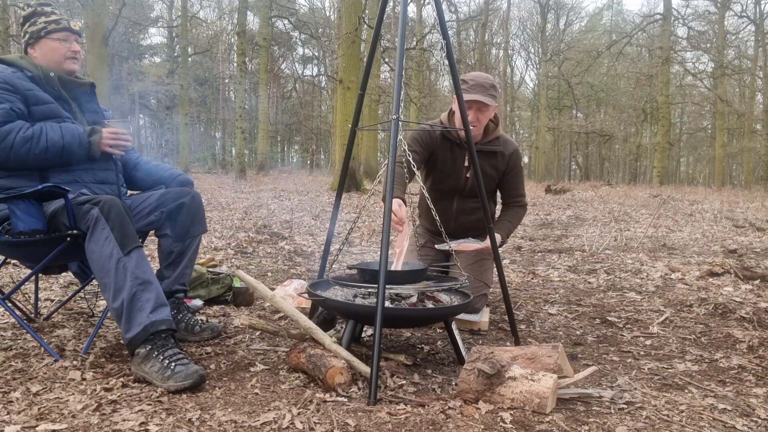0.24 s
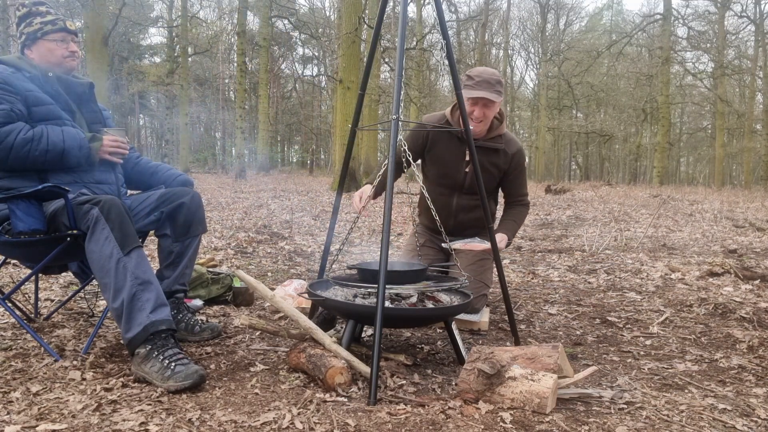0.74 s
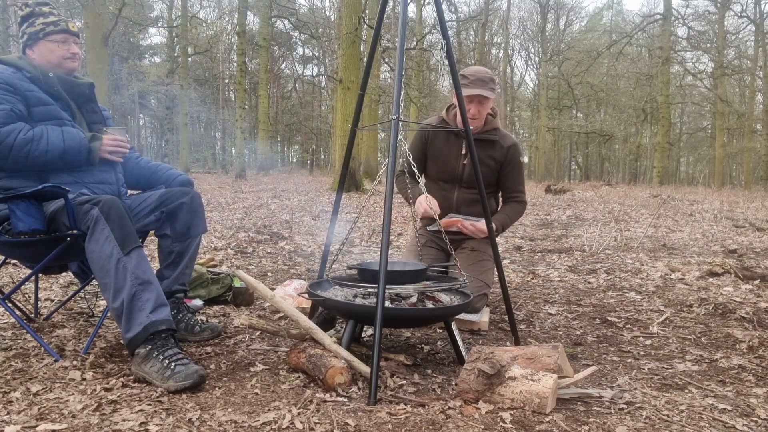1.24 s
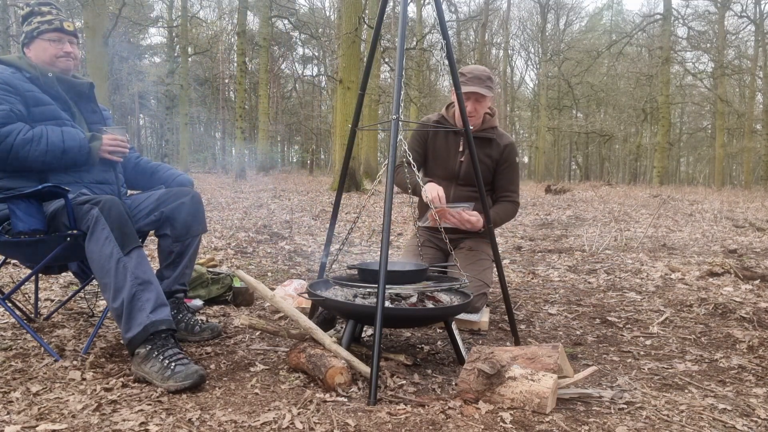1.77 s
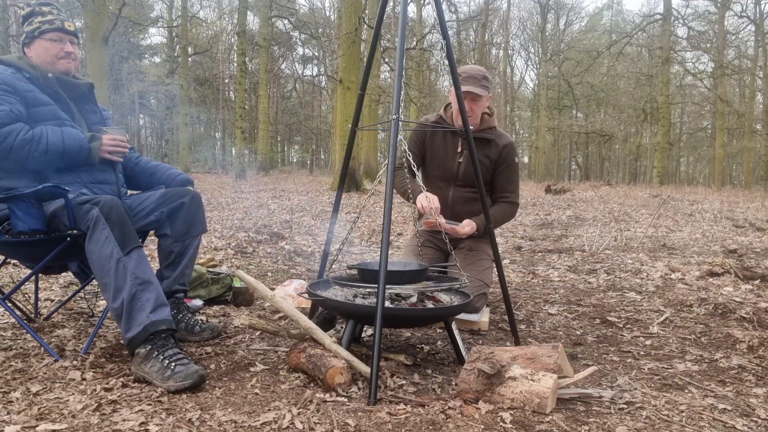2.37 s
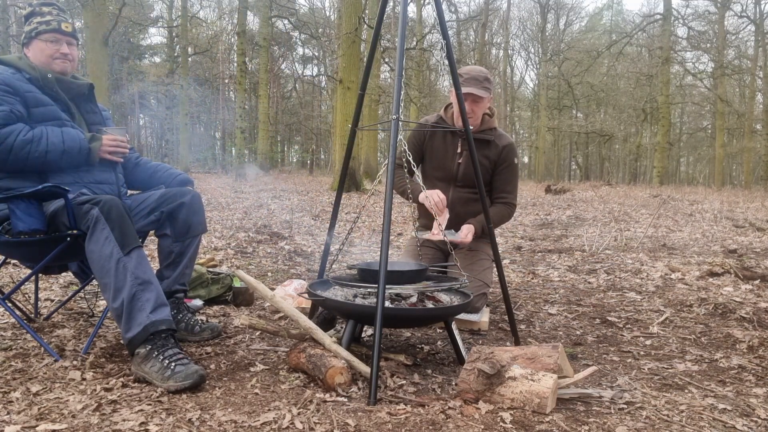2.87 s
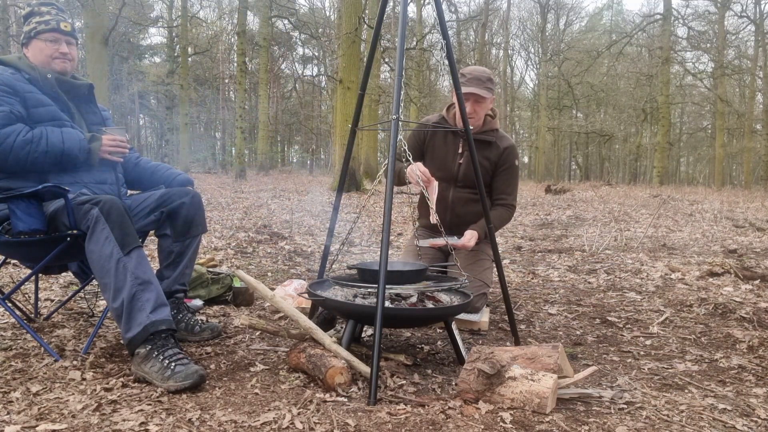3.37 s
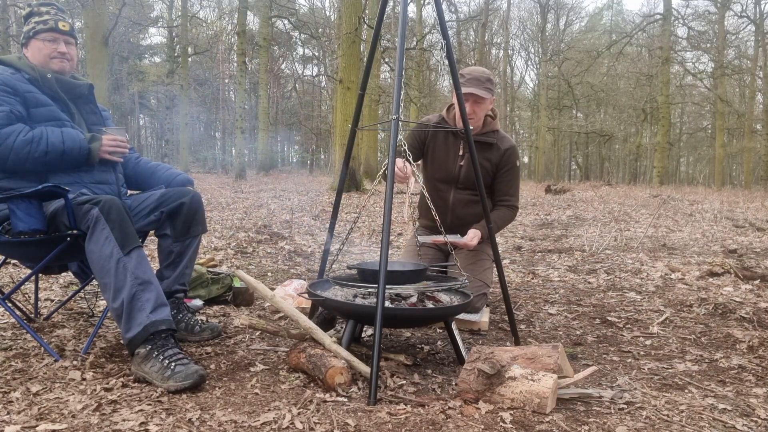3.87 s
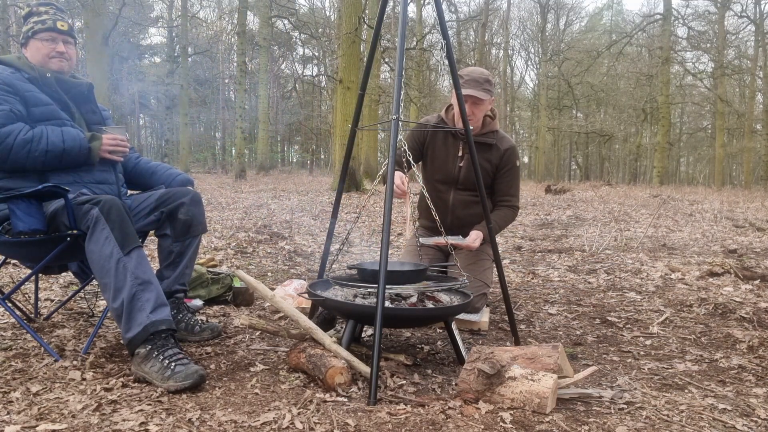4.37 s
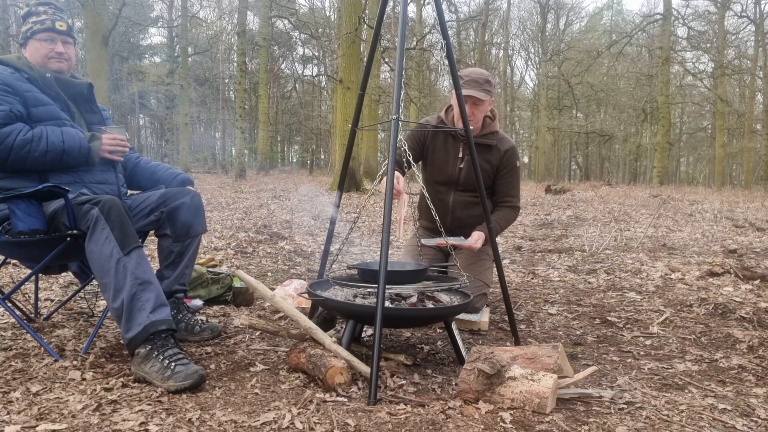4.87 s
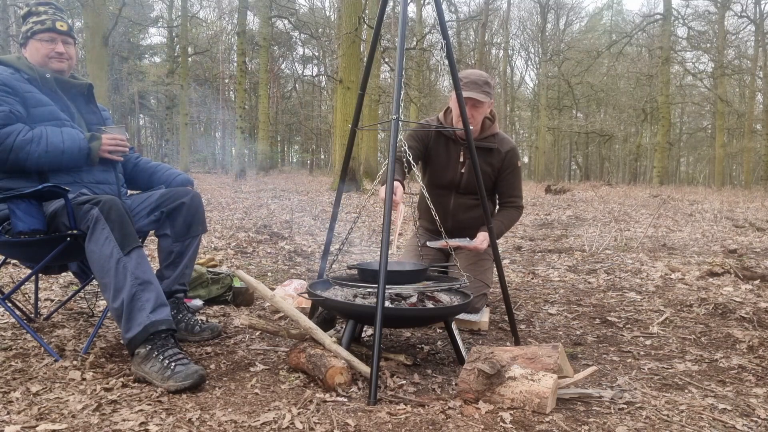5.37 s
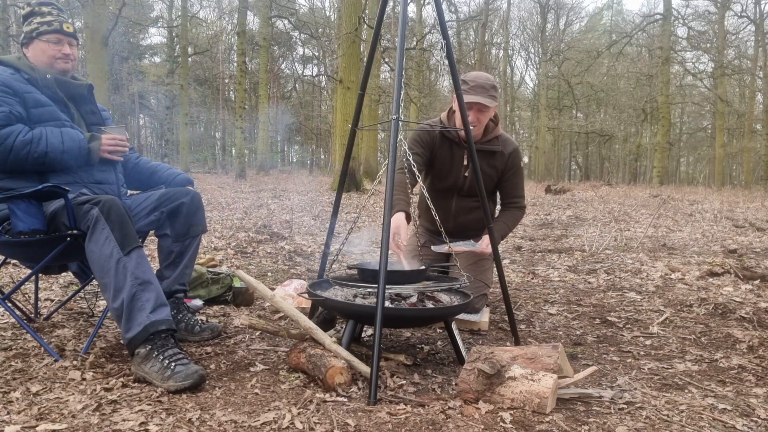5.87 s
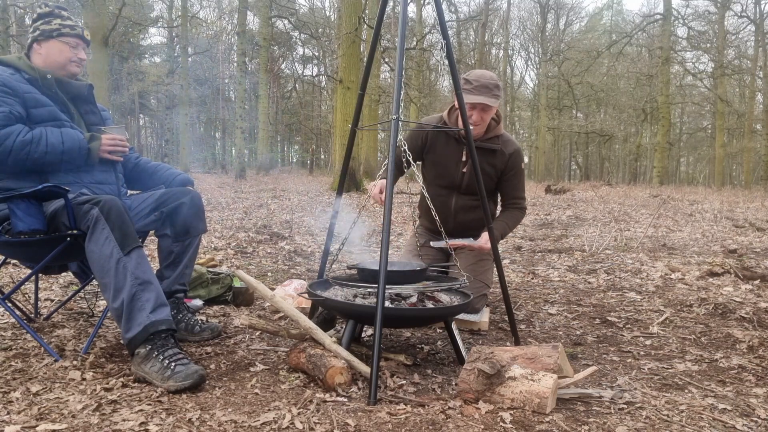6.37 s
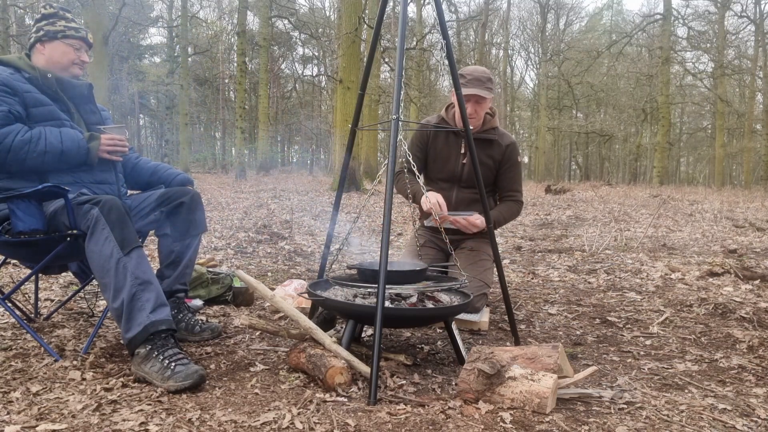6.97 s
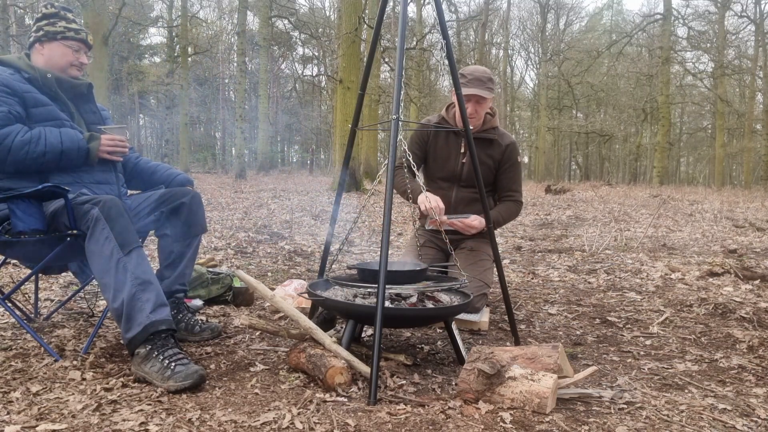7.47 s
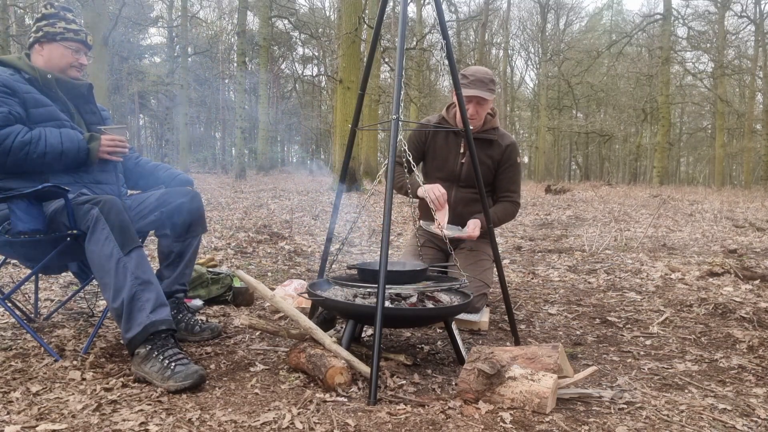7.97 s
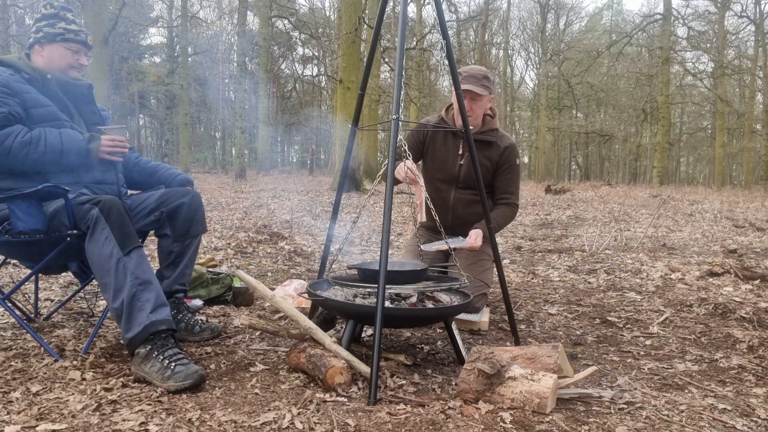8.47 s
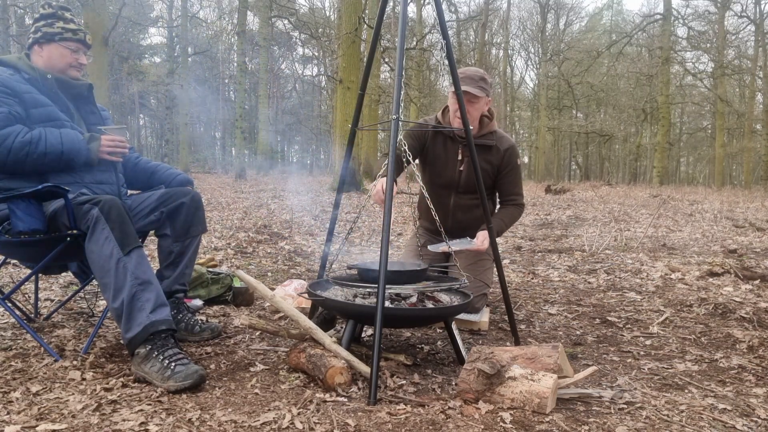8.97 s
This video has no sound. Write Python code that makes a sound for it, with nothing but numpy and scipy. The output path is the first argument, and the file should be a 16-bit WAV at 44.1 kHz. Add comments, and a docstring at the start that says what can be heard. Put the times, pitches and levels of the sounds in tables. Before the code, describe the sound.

Bacon fries in an iron pan over a wood fire in a woodland clearing, in front and slightly left. A steady, bright sizzle with bubbling and small spits runs throughout, above a low hum like a far engine and an occasional soft flutter of flames. Burning wood snaps irregularly, most sharply at about 0.2, 1.5, 5 and 7.6 seconds. Steam bursts in short hollow pops, clustering around 1.7, 5.9 and 7.2 seconds, with the loudest at 8 seconds. Small birds trill and whistle faintly among the trees from 0.6 until 4 seconds. Light handling rustles come and go from 0.6 to about 8.5 seconds, and a few soft, dull knocks sound, clearest near 1.2 and 5.1 seconds. The pan rings faintly near 0.9 and 5.9 seconds as fresh rashers go in. The sizzle continues to the end, just past 9 seconds.

```python
"""Bacon fries in a pan hung over a wood fire in a woodland clearing.
From the start, over a low hum as of a far engine, fat sizzles, bubbles and spits and flames flutter.
Burning wood snaps, steam pockets burst with hollow pops, and dull knocks sound. From 0.6 s handling
rustles and small birds call faintly, the birds until 4 s. Near 0.9 s and 5.9 s a fresh rasher sets
the iron ringing. The loudest pop comes at 8 s."""
import sys
import numpy as np
from scipy import signal
from scipy.fft import rfft, irfft, next_fast_len
from scipy.io import wavfile
from scipy.ndimage import uniform_filter1d

SR = 44100
rng = np.random.default_rng(int(sys.argv[2]) if len(sys.argv) > 2 else 0)


def dump(signal):
    """Clip the signal to [-1, 1] and save it as 16-bit WAV at the path in sys.argv[1]."""
    limited = np.clip(np.atleast_2d(signal).T, -1, 1)
    pcm = np.round(limited * 32767).astype(np.int16)
    wavfile.write(sys.argv[1], SR, pcm)


N = 407043
T = np.arange(N) / SR
FFT_SIZE = next_fast_len(N + 2048)
FFT_HZ = np.fft.rfftfreq(FFT_SIZE, 1 / SR)


def gain(db):
    """Decibels to amplitude."""
    return 10 ** (np.asarray(db) / 20)


def unit_rms(x):
    """Scale to rms 1."""
    return x / np.sqrt(np.mean(x ** 2) + 1e-20)


def unit_peak(x):
    """Scale the envelope peak to 1."""
    return x / abs(signal.hilbert(x)).max()


def lookup(points, hz):
    """Interpolate a table on a log-frequency axis."""
    f, value = np.transpose(points)
    return np.interp(np.log(hz + 1), np.log(f + 1), value)


def add(mix, start_s, sound):
    """Mix a sound in at start_s."""
    part = mix[max(round(start_s * SR), 0):][:len(sound)]
    part += sound[:len(part)]


def coloured(x, colour):
    """Filter by rows of freq_hz, gain_db."""
    return irfft(rfft(x, FFT_SIZE) * gain(lookup(colour, FFT_HZ)), FFT_SIZE)[..., :N]


def click(spectrum_db):
    """Minimum-phase pulse with this spectral shape from 0 Hz to SR / 2."""
    log_gain = np.log(gain(np.maximum(spectrum_db, spectrum_db.max() - 70)))
    mirrored = np.concatenate([log_gain, log_gain[-2:0:-1]])
    spectrum = np.exp(np.conj(signal.hilbert(mirrored)))
    return unit_peak(np.fft.ifft(spectrum).real)


def child_rng():
    """Independent random stream."""
    return np.random.default_rng(rng.integers(1 << 30))


def drift(top_hz):
    """Slow random curve, rms 1."""
    knots_s = np.arange(0, N / SR + 1, 1 / (2 * top_hz))
    return unit_rms(np.interp(T, knots_s, child_rng().standard_normal(len(knots_s))))


def impulses(per_s, spread_db, cap=4):
    """Random impulse train, sizes spanning cap * spread_db."""
    when, size, sign = child_rng().random((int(per_s * N / SR) + 1, 3)).T
    height = gain(spread_db * np.minimum(-np.log(1 - size), cap)) * np.sign(sign - .5)
    return np.bincount((when * N).astype(int), height, N)


def swells(rows):
    """Envelope of Gaussian swells."""
    return sum(gain(db) * np.exp(-2 * ((T - mid_s) / width_s) ** 2) for mid_s, width_s, db in rows)


def scatter(x, near_db, near_t60_s, far_db, far_t60_s):
    """Direct sound, quick reflections off pan, fire bowl and ground, and a return from the trees."""
    t = np.arange(SR // 2) / SR
    near, far = rng.standard_normal((2, 2, len(t))) * (t > .0012)
    near, far = near * gain(-60 * t / near_t60_s), far * gain(-60 * t / far_t60_s)
    near = near + near[::-1] / 2  # channel crossfeed
    tail = gain(near_db) * near / np.linalg.norm(near[0]) + gain(far_db) * far / np.linalg.norm(far[0])
    return x + signal.oaconvolve(np.atleast_2d(x), tail, axes=1)[:, :N]


# Left-right likeness: freq_hz, coherence
STEREO_COHERENCE = [(60, 0.79), (130, 0.97), (300, 0.6), (1400, 1), (3100, 0.67), (6800, 0.21),
                    (10000, 0.53), (15000, 0.12)]


def stereo(a, b):
    """Two channels from two unrelated sounds: alike in the bass, apart in the treble."""
    coherence = np.clip(lookup(STEREO_COHERENCE, FFT_HZ), -1, 1)
    mid = rfft(a, FFT_SIZE) * np.sqrt((1 + coherence) / 2)
    side = rfft(b, FFT_SIZE) * np.sqrt((1 - coherence) / 2)
    return irfft(np.array([mid + side, mid - side]), FFT_SIZE)[:, :N]


# Rumble of flames and open air: freq_hz, gain_db
AIR_COLOUR = [(10, -23), (25, -15), (40, -4), (55, 3), (75, 6), (110, -3.5), (150, -9), (200, -13),
              (330, -14.5), (450, -58), (560, -13.5), (760, -17.5), (900, -17), (1800, -10), (3000, -21.5)]


def hum_and_air(hum_hz=70.6, hum_db=-53, air_db=-59.0, gust_db=1.3):
    """A steady low hum in the soft rumble of flames and open air."""
    hum = gain(hum_db + 0.11 * drift(7.4)) * np.sin(2 * np.pi * hum_hz * T + 0.045 * drift(2.6))
    air = unit_rms(stereo(*coloured(rng.standard_normal((2, N)), AIR_COLOUR)))
    return hum + gain(air_db + gust_db * drift(5)) * air


def crackle(lo_hz, hi_hz, per_s, spread_db, cycles, colour, cap=7.5):
    """Tiny bursts, each ringing briefly at its own pitch and place in the pan."""
    draws = child_rng().random((int(per_s * N / SR) + 1, 5, 1))
    when, size, pitch, damping, place = draws.transpose(1, 0, 2)
    n = np.arange(160)
    hz = lo_hz * (hi_hz / lo_hz) ** pitch
    decay_cycles = cycles * 4 ** (2 * damping - 1)
    turns = n * hz / SR
    level_db = spread_db * np.minimum(-np.log(1 - size), cap) + lookup(colour, hz)
    envelope = gain(level_db) * np.exp(-turns / decay_cycles) / np.sqrt(decay_cycles)
    index = ((when * N).astype(int) + n).ravel()
    skew_turns = (place - .5) * hz / 20000
    grains = [envelope * np.sin(2 * np.pi * (turns + side * skew_turns)) for side in (-1, 1)]
    out = np.array([np.bincount(index, channel.ravel(), N)[:N] for channel in grains])
    return unit_rms(scatter(out, near_db=-4.0, near_t60_s=0.025, far_db=-13.5, far_t60_s=0.29))


# Sizzle spectrum: freq_hz, gain_db
SIZZLE_COLOUR = [(1000, -32), (1700, -8.5), (2260, -10), (2890, -2.5), (3160, 1.5), (3510, 1.5), (3740, -1),
                 (4800, -0.5), (5220, -2), (7200, 1.5), (8280, -8.5), (9000, -17), (11700, -28),
                 (19800, -120)]
# Finest fizz spectrum: freq_hz, gain_db
FIZZ_COLOUR = [(3000, -45), (6500, -29), (8500, -4), (11500, -2.5), (13000, 2), (15000, 11), (16000, -6)]
# Frying strength: time_s, sizzle_db, fizz_db
FRYING_LEVELS = [(0.0, -54, -64.5), (0.46, -53.5, -61), (0.67, -52, -59), (1.03, -55.5, -63),
                 (1.3, -54, -62.5), (2.21, -53.5, -64), (3.01, -54.5, -62.5), (3.85, -54, -61.5),
                 (4.04, -56.5, -62), (4.7, -53, -62), (5.45, -52.5, -60.5), (5.9, -52, -59),
                 (6.5, -54.5, -62), (7.45, -52, -60), (7.89, -55.5, -63), (8.38, -55, -60.5),
                 (8.66, -49, -63), (8.95, -56, -60), (9.23, -52.5, -59.5)]


def sizzle(hiss_db=-0.5, tick_db=-1.88, fizz_db=1.3, prickle_db=-1.0, flutter_db=0.71, swell_db=0.97):
    """Countless tiny bubbles merge into a hiss; larger ones stand out as ticks."""
    hiss = unit_rms(stereo(*[coloured(impulses(9000, 3.5), SIZZLE_COLOUR) for _ in range(2)]))
    fizz = unit_rms(stereo(*[coloured(impulses(9000, 1.7), FIZZ_COLOUR) for _ in range(2)]))
    ticks = crackle(2697, 7370, per_s=500, spread_db=4.0, cycles=1.84, colour=SIZZLE_COLOUR, cap=3.93)
    prickle = crackle(9000, 14600, per_s=420, spread_db=1.0, cycles=3.3, colour=FIZZ_COLOUR)
    time_s, body_db, top_db = np.transpose(FRYING_LEVELS)
    body = gain(np.interp(T, time_s, body_db)) * (gain(hiss_db) * hiss + gain(tick_db) * ticks)
    top = gain(np.interp(T, time_s, top_db)) * (gain(fizz_db) * fizz + gain(prickle_db) * prickle)
    return gain(flutter_db * drift(60) + swell_db * drift(9)) * (body + top)


# Steam cavity resonance: pitch_ratio, gain_db
CAVITY_COLOUR = [(.05, -48), (.5, -41), (.68, -28.5), (.8, -9.5), (.97, 4.5), (1.2, -6), (1.42, -13),
                 (1.72, -46.5), (2.5, -18), (3.6, -58), (12, -79)]
# Surrounding bowl: freq_hz, gain_db
BOWL_COLOUR = [(60, -34), (200, -19.5), (340, -11.5), (470, -29.5), (600, -19.5), (730, -15.5), (850, -31),
               (1500, -53.5)]


def pop(pitch_hz, bowl_db=-21.5, opening_cycles=2.28):
    """A steam pocket opens over a couple of cycles and its cavity rings for a few more."""
    f = np.fft.rfftfreq(2048, 1 / SR)
    opening = np.clip(np.arange(2048) * pitch_hz / SR / opening_cycles, 0, 1)
    cavity = unit_peak(click(lookup(CAVITY_COLOUR, f / pitch_hz)) * np.sin(opening * np.pi / 2) ** 2)
    return unit_peak(cavity + gain(bowl_db) * click(lookup(BOWL_COLOUR, f)))


# Bubbling in the fat: time_s, level_db
BUBBLING_LEVELS = [(0.0, -52), (0.18, -66), (0.44, -65), (0.75, -58.5), (1.0, -62.5), (1.22, -61.5),
                   (1.6, -64.5), (1.93, -59.5), (2.62, -65), (3.83, -66), (4.5, -63.5), (5.35, -60.5),
                   (6.6, -60), (7.17, -61), (7.76, -66.5), (8.35, -61), (9.23, -67)]


def bubbling(gain_db=1.8, per_pitch_per_s=11):
    """Small steam pops simmer throughout, at eight pitches."""
    out = sum(signal.oaconvolve(impulses(per_pitch_per_s, 4.5, cap=2.6), pop(hz))[:N]
              for hz in np.geomspace(1150, 1440, 8))
    wet = scatter(out, near_db=-4.0, near_t60_s=0.077, far_db=-12, far_t60_s=0.45)
    return unit_rms(wet) * gain(np.interp(T, *np.transpose(BUBBLING_LEVELS)) + gain_db)


# Iron pan modes: freq_hz, level_db, t60_s
PAN_MODES = [(569, -5, 0.23), (762, 8.5, 0.17), (825, -26, 0.075), (1757, -10, 0.096), (3980, 14, 0.11)]
# Fresh rashers meeting the iron: mid_s, width_s, level_db
RASHER_SWELLS = [(0.9, 0.91, -80), (5.9, 1.0, -73)]


def pan_ring(rest_db=-76):
    """Bubbling fat keeps the iron faintly ringing, most when a fresh rasher goes in."""
    t = np.arange(SR // 5) / SR
    modes = sum(gain(db - 60 * t / t60_s) * np.sin(2 * np.pi * hz * t) for hz, db, t60_s in PAN_MODES)
    ring = unit_rms(signal.oaconvolve(impulses(60, 2.9), modes)[:N])
    return ring * (gain(rest_db) + swells(RASHER_SWELLS))


# Colour that pan and ground give spits and snaps: freq_hz, gain_db
CRACK_COLOUR = [(1000, 14.5), (1800, -2), (2300, -4.5), (3000, -1), (7200, 3), (9000, 1.5), (12000, 3),
                (15000, 13)]


def spits(gain_db=-39, per_s=7, spread_db=2.5, centre_hz=4400, slope_db=8):
    """Faint spits of fat tick at random."""
    f = np.fft.rfftfreq(1024, 1 / SR)
    band_db = np.maximum(-slope_db * np.log2((f + 20) / centre_hz) ** 2, -36)
    crack = click(band_db + lookup(CRACK_COLOUR, f))
    ticks = signal.oaconvolve(impulses(per_s, spread_db, cap=1.17), crack)[:N]
    return gain(gain_db) * scatter(ticks, near_db=2.0, near_t60_s=.04, far_db=1, far_t60_s=.11)


# Low flame buffets: mid_s, width_s, level_db
FLAME_BUFFETS = [(.3, 0.61, -66), (1.35, 0.49, -68), (2.25, .25, -65), (7.54, 0.16, -62), (8.22, 0.12, -66)]


def flames():
    """Now and then the flames flap with a low flutter."""
    colour = [(30, -16), (70, -8), (110, 6.5), (180, -5.0), (280, -6.5), (450, -30), (1500, -38)]
    return swells(FLAME_BUFFETS) * unit_rms(coloured(rng.standard_normal(N), colour))


# Sharpest wood snaps and fat spits: start_s, level_db, centre_hz, spread_oct
SHARP_SNAPS = [(0.034, -26.5, 5800, 0.6), (0.1889, -17.5, 2360, 0.46), (0.4051, -30, 6000, 0.59),
               (0.5158, -31, 2980, 0.84), (0.5535, -35, 3720, 0.45), (0.7134, -26, 5260, 0.92),
               (1.2568, -27.5, 5130, 0.96), (1.4707, -28.5, 4450, 0.72), (1.4977, -21, 5770, 0.88),
               (1.903, -28, 5100, 0.2), (4.7142, -25, 3900, 0.98), (4.9647, -16.5, 2600, 0.51),
               (4.98, -31, 3170, 0.38), (5.8339, -25, 6950, 0.83), (6.749, -33.5, 3000, 0.35),
               (7.2215, -27.5, 3020, 0.35), (7.411, -25.5, 5440, 0.89), (7.6369, -16.5, 4020, 0.98),
               (8.0739, -23, 3900, 1.14), (8.6855, -35, 2280, 0.33), (8.9032, -31, 4810, 0.48)]


def snaps(gain_db=-1, slope_db=6, spray_db=1.5, spray_t60_s=0.033):
    """A crack of about a millisecond, then a short spray of splinters and reflections."""
    out, f, t = np.zeros((2, N)), np.fft.rfftfreq(1024, 1 / SR), np.arange(2048) / SR
    spray_envelope = gain(-60 * t / spray_t60_s) * np.minimum(t / 0.00014, 1)
    for start_s, level_db, centre_hz, spread_oct in SHARP_SNAPS:
        distance = np.log2((f + 20) / centre_hz) / spread_oct
        band_db = np.maximum(-slope_db * distance ** 2, -38)
        crack = gain(level_db + gain_db) * click(band_db + lookup(CRACK_COLOUR, f))
        left, right, both = rng.standard_normal((3, len(t))) * spray_envelope
        for channel, spray in zip(out, (left + both, right + both)):
            splinters = signal.fftconvolve(crack, spray / np.linalg.norm(spray))
            add(channel, start_s, crack)
            add(channel, start_s, gain(spray_db) * splinters)
    return scatter(out, near_db=-6, near_t60_s=0.079, far_db=-14, far_t60_s=0.1)


# Loudest steam bursts: start_s, level_db, pitch_hz
STEAM_POPS = [(0.0968, -37, 1236), (0.7903, -41.5, 1330), (0.8056, -39.5, 1340), (0.8131, -41, 1330),
              (1.6876, -33.5, 1390), (1.7561, -36, 1500), (1.8259, -35, 1460), (2.7499, -40.5, 1305),
              (3.4881, -31.5, 1330), (4.7131, -33.5, 1310), (4.7626, -41, 1230), (5.0157, -38.5, 1470),
              (5.4824, -40, 1320), (5.8837, -26.5, 1530), (5.8894, -25, 1496), (6.2111, -27, 1350),
              (6.309, -37.5, 1240), (6.3923, -37, 1145), (6.4823, -42.5, 1150), (6.6208, -41.5, 1250),
              (7.199, -33.5, 1230), (7.2058, -26.5, 1290), (7.2226, -28.5, 1380), (7.315, -42, 1240),
              (7.704, -40.5, 1120), (8.028, -20.5, 1297), (8.9043, -41, 1220)]


def steam_pops(gain_db=4.6):
    """Single steam pockets burst clear of the bubbling, each at its own pitch."""
    out = np.zeros(N)
    for start_s, level_db, pitch_hz in STEAM_POPS:
        add(out, start_s, gain(level_db + gain_db) * pop(pitch_hz))
    return scatter(out, near_db=-11, near_t60_s=.045, far_db=-22, far_t60_s=.3)


# Soft knocks: start_s, level_db, centre_hz
DULL_KNOCKS = [(0.145, -46, 445), (0.538, -54, 292), (1.185, -41, 836), (1.332, -51, 570),
               (3.606, -51, 570), (3.869, -52.5, 487), (4.509, -52.5, 318), (5.128, -41.5, 780),
               (8.79, -48, 684)]


def knocks(slope_db=9):
    """Dull knocks: a broad, heavily damped ring around one pitch."""
    out, f = np.zeros(N), np.fft.rfftfreq(4096, 1 / SR)
    for start_s, level_db, centre_hz in DULL_KNOCKS:
        third_octaves = 3 * np.log2((f + 10) / centre_hz)
        add(out, start_s, gain(level_db) * click(-slope_db * np.log2(1 + third_octaves ** 2)))
    return scatter(out, near_db=-5.5, near_t60_s=0.12, far_db=-8, far_t60_s=0.23)


# Handling of the rashers: mid_s, width_s, level_db
RUSTLE_SWELLS = [(0.6, 0.05, -51.5), (1.22, 0.11, -54), (2.16, 0.03, -56), (3.14, 0.097, -58),
                 (4.33, 0.19, -58.5), (5.1, 0.076, -53), (6.07, 0.039, -50.5), (6.19, 0.045, -51),
                 (6.6, 0.022, -50.5), (6.87, 0.2, -59), (8.28, 0.12, -53), (8.49, .13, -55.5)]


def rustles(gain_db=2.0):
    """Handling rustles: clumps of dry grains under short swells."""
    colour = [(500, -29), (1100, -15), (2000, -11), (2750, 10.5), (3600, 15.5), (5000, -37.5),
              (12000, -32)]
    grains = crackle(1500, 4400, per_s=700, spread_db=3, cycles=2, colour=colour, cap=3)
    return gain(gain_db) * swells(RUSTLE_SWELLS) * grains


def whistle(length_s, first_hz, last_hz, waver=0.023):
    """One thin, slightly unsteady bird glide."""
    count = max(int(length_s * SR), 8)
    wobble = unit_rms(uniform_filter1d(rng.standard_normal(count), 60))
    hz = np.linspace(first_hz, last_hz, count) * (1 + waver * wobble)
    return np.sin(2 * np.pi * np.cumsum(hz) / SR) * signal.windows.tukey(count, .5)


# Single calls: start_s, length_s, first_hz, last_hz, level_db
BIRD_WHISTLES = [(0.602, .06, 4920, 4750, -51.5), (1.284, 0.075, 7500, 7380, -56),
                 (1.499, 0.055, 4430, 4200, -51.5), (2.278, 0.081, 5980, 6650, -56),
                 (2.77, .1, 6080, 5880, -58), (3.772, 0.055, 7800, 6700, -49),
                 (3.833, 0.17, 7200, 7130, -56.5)]
# Repeated falling chirps: start_s, end_s, chirps_per_s, length_s, first_hz, last_hz, level_db
BIRD_TRILLS = [(0.74, 1.2, 12, 0.053, 3780, 3580, -54.5), (2.877, 3.73, 13.3, 0.0293, 4710, 3880, -52.5)]


def birds(gain_db=-2):
    """Even trills and single whistles, blurred by the trees."""
    out = np.zeros(N)
    for start_s, end_s, chirps_per_s, length_s, first_hz, last_hz, level_db in BIRD_TRILLS:
        for chirp_s in np.arange(start_s, end_s, 1 / chirps_per_s):
            add(out, chirp_s, gain(level_db + gain_db) * whistle(length_s, first_hz, last_hz))
    for start_s, length_s, first_hz, last_hz, level_db in BIRD_WHISTLES:
        add(out, start_s, gain(level_db + gain_db) * whistle(length_s, first_hz, last_hz))
    return scatter(out, near_db=-3, near_t60_s=.05, far_db=-5, far_t60_s=.5)


def scene(bright_left_db=1, hollow_left_db=0.3, right_lag_s=2.4e-5):
    """The fire in front, slightly left, with the woodland all round."""
    bright = (sizzle() + snaps() + spits() + rustles()) * gain([[bright_left_db], [-bright_left_db]])
    hollow = (steam_pops() + bubbling() + pan_ring()) * gain([[hollow_left_db], [-hollow_left_db]])
    fire = bright + hollow + knocks() + flames()
    lag = np.exp(-2j * np.pi * FFT_HZ * right_lag_s)
    fire[1] = irfft(rfft(fire[1], FFT_SIZE) * lag, FFT_SIZE)[:N]
    return fire + hum_and_air() + birds()


def record(dry):
    """Steep low-pass at 15.9 kHz."""
    lowpass = signal.firwin(511, 15900, window=("kaiser", 9), fs=SR)
    return signal.oaconvolve(dry, lowpass[None], "same")


dry = scene()
out = record(dry)
dump(out)
```